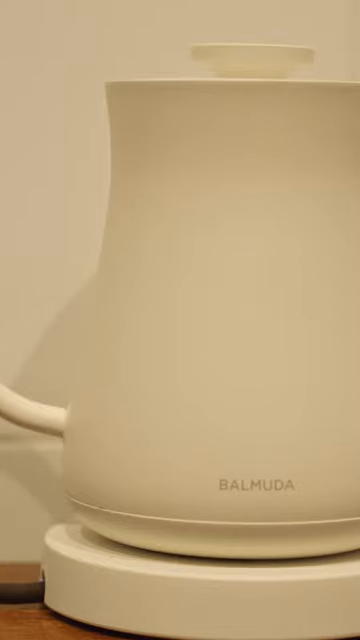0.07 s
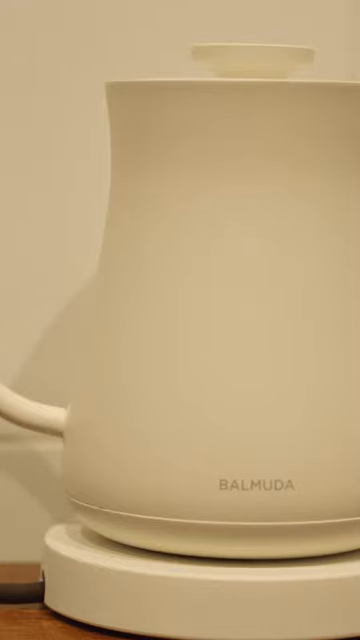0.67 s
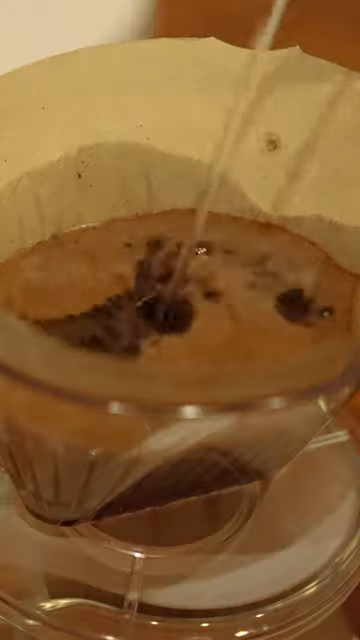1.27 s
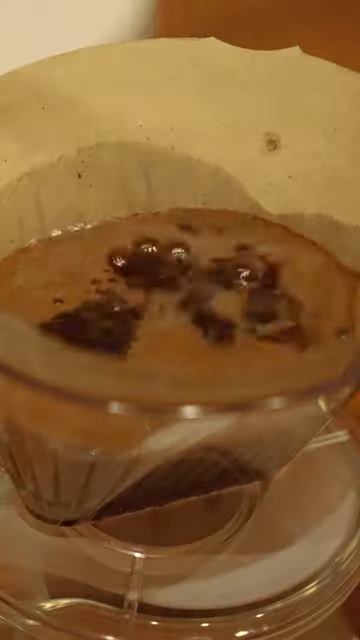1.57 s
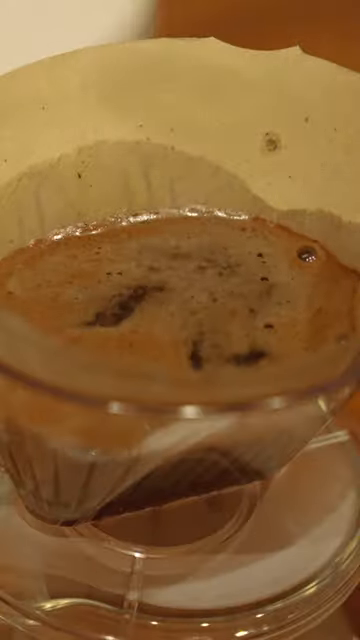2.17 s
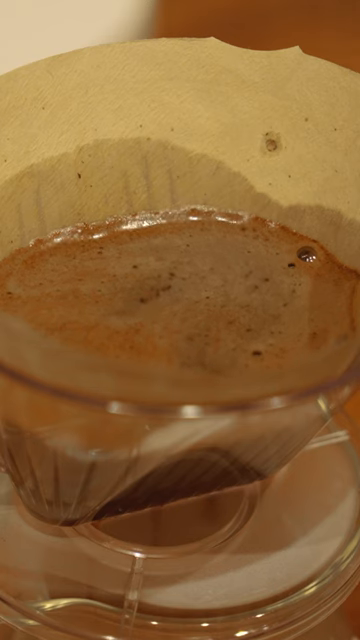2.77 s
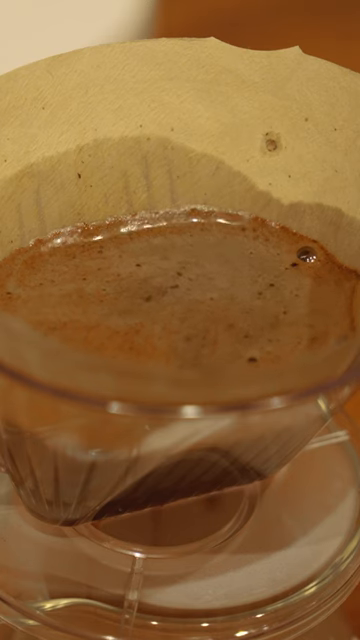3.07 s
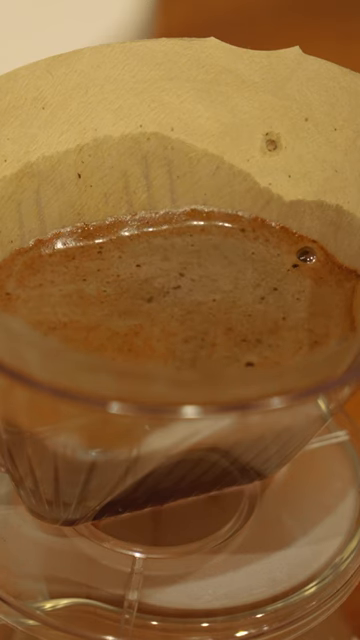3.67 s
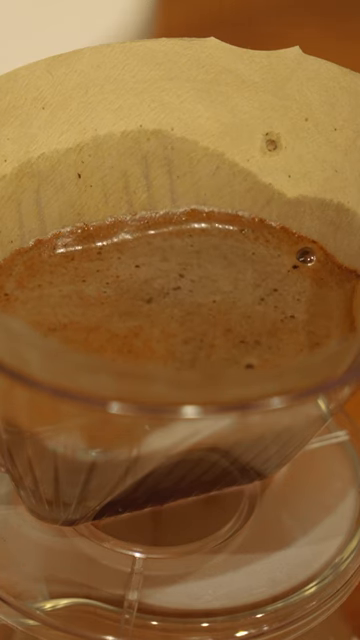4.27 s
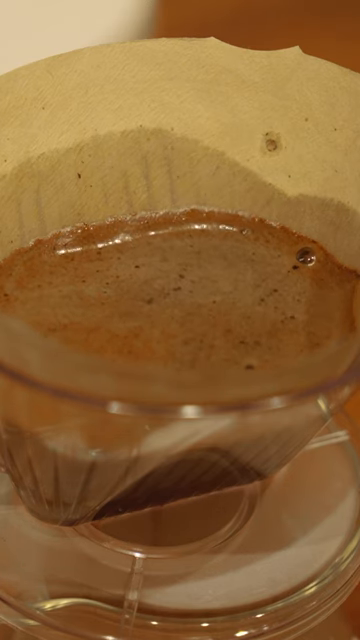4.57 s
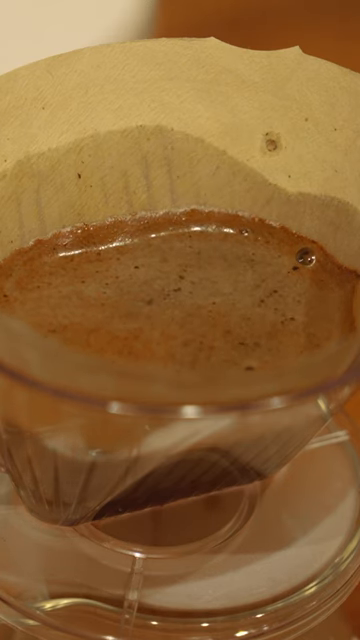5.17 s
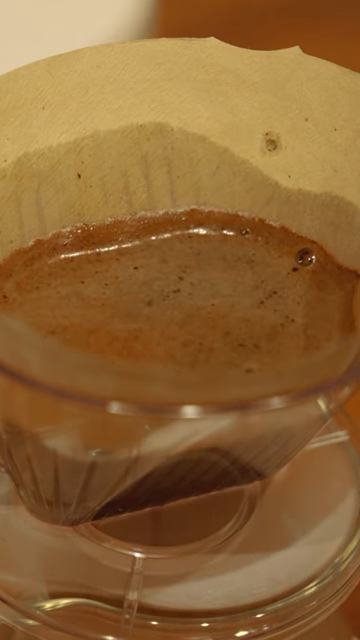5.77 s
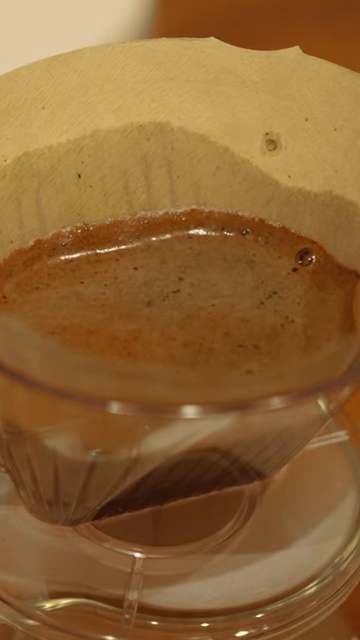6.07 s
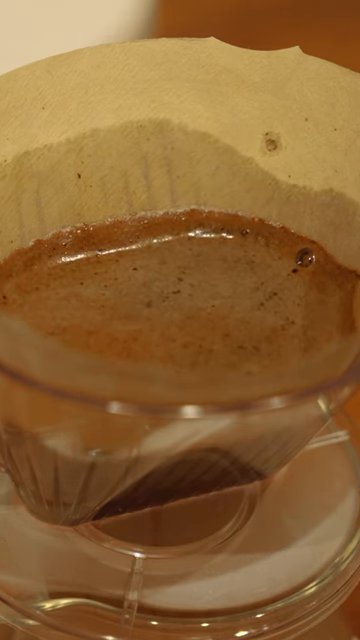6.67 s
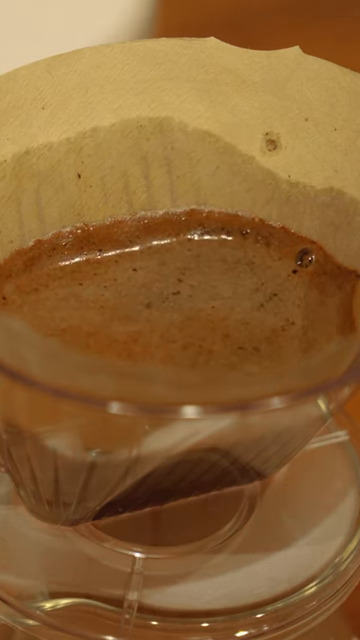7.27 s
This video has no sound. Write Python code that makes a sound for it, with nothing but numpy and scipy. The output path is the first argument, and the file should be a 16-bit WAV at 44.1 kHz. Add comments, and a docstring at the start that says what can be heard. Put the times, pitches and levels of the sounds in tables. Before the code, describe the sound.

A brief pour of water splashes into a coffee filter, then light drips tick and tinkle into a glass server over a low hum.

```python
"""A small room with a low ventilation hum; the microphone is close on a coffee dripper, nearly mono.
A thin stream from a kettle splashes into wet grounds in a paper filter, and the foam fizzes out.
Coffee then drips into the glass server below: drops tick on the pool, and trapped bubbles ping and
set the glass ringing. Far behind, something knocks dully once a second."""
import sys
import numpy as np
from scipy import signal
from scipy.fft import rfft, irfft, next_fast_len
from scipy.io import wavfile
from scipy.ndimage import map_coordinates

SR = 44100
rng = np.random.default_rng(int(sys.argv[2]) if len(sys.argv) > 2 else 0)


def bounce(signal):
    """Save signal as a 16-bit WAV file at the path given by the first command-line argument."""
    frames = np.transpose(np.atleast_2d(signal))
    limited = np.clip(frames, -1, 1)
    pcm = np.round(limited * 32767).astype(np.int16)
    wavfile.write(sys.argv[1], SR, pcm)


N = 323253
HIT_SAMPLES = 10240
TIME = np.arange(N) / SR
AGE = TIME[:HIT_SAMPLES]  # seconds since a hit
POUR_START_S, POUR_END_S = .756, 1.44


# A slight midrange dip in the tone of the plops and the churn: f/Hz, gain/dB
MID_DIP_EQ = [(260, 1), (400, -1), (650, -4), (1000, -2.5), (1800, -4.5), (2500, -2.5), (6000, -3),
              (15000, 0)]
# The bright tone of spray: f/Hz, gain/dB
SPRAY_EQ = [(500, -33), (2000, -24), (3300, 7), (5200, 8.5), (7500, 7), (10000, 12), (12500, 6), (16000, 1)]
# Plunges of the stream, close up: t/s, plop level/dB, cavity f/Hz, snap level/dB, snap f/Hz
PLUNGES = [(0.758, -39.5, 1440, -42.5, 3060), (.767, -40.5, 1720, -44, 4500),
           (0.795, -39.5, 1710, -42.5, 3050), (.81, -46, 1600, -48, 6000), (0.917, -34, 1210, -52, 3000),
           (0.949, -31.5, 1360, -46, 2500), (0.983, -56, 1500, -47, 9000), (1.042, -30, 1070, -34, 8400),
           (1.071, -29.5, 1030, -40, 3500), (1.1, -34.5, 1230, -44, 3000), (1.116, -43, 1710, -44, 4930),
           (1.126, -35.5, 1530, -46, 3000), (1.2362, -44, 1300, -49, 5200), (1.253, -29, 1150, -45, 6000),
           (1.269, -30.5, 1220, -42, 4000), (1.289, -15, 1150, -26, 6400), (1.321, -46, 1400, -37, 7080),
           (1.3298, -15.5, 910, -38, 5240), (1.335, -27.5, 496, -60, 3000), (1.406, -29.5, 1180, -48, 9000),
           (1.4141, -26.5, 1440, -31.5, 11100), (1.4209, -26, 1320, -35.5, 4600),
           (1.4381, -29.5, 1040, -38, 3480), (1.4497, -29, 1070, -35, 4470),
           (1.475, -43, 1600, -31.5, 6740), (1.508, -53, 1490, -34.5, 10200), (1.551, -47, 1700, -52, 6000),
           (1.578, -42.5, 1620, -58, 5000), (1.637, -58, 1690, -47, 8000), (1.661, -54, 1710, -41.5, 7100),
           (1.68, -60, 1700, -50, 7000), (1.753, -68, 1700, -46, 7950)]
def splashes():
    """Each plunge snaps, then its cavity plops, breaks up and sounds the cone and the dripper."""
    out = np.zeros(N)
    for s, plop_db, hz, snap_db, snap_hz in PLUNGES:
        body = dripper_body()
        cavity = bubble(hz, cycles=1.4, rise=.1) * (1 - fade(t60=.002))
        plop = colour(hit_level(cavity, 0) + gurgle(hz) + hit_level(body, -2), MID_DIP_EQ)
        crack = impact(near_t60=.009, near_db=1, far_t60=.08, far_db=-8)
        snap = colour(through(bubble(snap_hz, cycles=.5, rise=0), crack), SPRAY_EQ)
        add(out, s, hit_level(plop, plop_db) + hit_level(snap, snap_db))
    return out


# Resonances of the filter cone and the air around it: f/Hz, width/Hz, gain/dB
CONE_MODES = [(279, 20, -1), (534, 31, -10), (880, 130, -11.5), (1220, 280, -13), (1690, 75, -0.5),
              (2010, 120, -8), (2720, 250, -18)]
# Modes of the dripper and its stand: f/Hz, level/dB, t60/s
DRIPPER_MODES = [(250, -6, .2), (533, -5, .15), (848, 0, .09), (992, 2, .09), (1119, 1, .12),
                 (1312, -5, .06), (1560, -5, .05), (1750, 1, .08), (2085, -1, .04)]
def dripper_body():
    """The dripper rings and the cone echoes after a plunge; both need a moment to swell."""
    phases = rng.uniform(0, 2 * np.pi, len(DRIPPER_MODES))
    ring = sum(undb(db) * fade(t60) * np.sin(2 * np.pi * hz * AGE + phase)
               for (hz, db, t60), phase in zip(DRIPPER_MODES, phases))
    echo = resonate(reflections(t60=.011, db=8) + reflections(t60=.12, db=.5), CONE_MODES)
    return (hit_level(echo, -1) + hit_level(ring, 3)) * (1 - fade(t60=.013))


def gurgle(hz, count=9, span_s=.048, fall_db=10, spread_oct=.45):
    """A cavity breaks into smaller ones, later and weaker, each with its own pitch."""
    out = np.zeros(HIT_SAMPLES)
    for k, (jitter, pitch) in enumerate(zip(rng.random(count), scatter(count, limit=2))):
        late = (k + jitter) / count
        small = bubble(hz * 2 ** (spread_oct * pitch), cycles=3.5, rise=.15)
        small = hit_level(small, -12 - fall_db * late)
        out += np.pad(small, (int(late * span_s * SR), 0))[:HIT_SAMPLES]
    return out


# Small bubbles in the slurry: t/s, level/dB, f/Hz
SLURRY_BUBBLES = [(0.919, -40, 3180), (0.958, -45, 2500), (1.034, -41, 1900), (1.055, -40.5, 3280),
                  (1.127, -42, 2900), (1.199, -36, 1970), (1.237, -37.5, 5060), (1.356, -40, 2050),
                  (1.363, -53, 2550), (1.373, -49, 2100), (1.4322, -37, 4450), (1.51, -41, 3200),
                  (1.525, -48, 4100)]
def plips():
    """The stream drags small bubbles under; each rings for a few cycles at its own pitch."""
    out = np.zeros(N)
    for s, db, hz in SLURRY_BUBBLES:
        blow = impact(near_t60=.015, near_db=-3, far_t60=.08, far_db=-7)
        add(out, s, hit_level(through(bubble(hz, cycles=2.8, rise=.1), blow), db))
    return out


def stream(rise_db_per_s=19, release_db_per_s=220, foam_attack_s=.04, foam_decay_db_per_s=32):
    """Cavities churn in the deepening slurry; once the kettle tips back, the foam fizzes out."""
    before = np.maximum(POUR_END_S - TIME, 0)
    after = np.maximum(TIME - POUR_END_S, 0)
    churning = undb(-34.5 - rise_db_per_s * before - release_db_per_s * after)
    foaming = undb(-46.5) * np.minimum(after / foam_attack_s, 1)
    fizzing = (undb(-54.5) + foaming) * undb(-foam_decay_db_per_s * after)
    churn = colour(resonate(patter(rate=450, spread_db=5.5), CONE_MODES), MID_DIP_EQ)
    fizz = sprinkle(rate=280, spread_db=4, voice=spatter)
    return (TIME > POUR_START_S) * (level(churn, -4.5) * churning + level(fizz, -1.5) * fizzing)


def spatter():
    """One fleck of spray or bursting foam on the wet grounds, with its own pitch."""
    snap = bubble(5500 * 2 ** rng.uniform(-1, 1), cycles=.4, rise=0)
    return colour(through(snap, impact(near_t60=.01, near_db=3, far_t60=.1, far_db=-9)), SPRAY_EQ)


# Larger drops on the pool, close up: t/s, tick level/dB, tilt/(dB per octave), plop peak level/dB
DROPS = [(1.946, -43.5, -6, -37), (2.012, -43, -5, -35.5), (2.2256, -44, -8, -32), (2.3165, -53, -4, -33.5),
         (2.681, -46, -10, -55), (2.782, -48, -4, -40), (2.844, -38, -4.5, -35), (2.9378, -63, -10, -34.5),
         (3.0665, -43, -5, -35), (3.1287, -35.5, -9, -35), (3.231, -63, -14, -30.5), (3.3533, -57, 2, -32),
         (3.8127, -46, 3, -37), (3.831, -45, 1, -31.5), (3.8764, -42, -12, -49), (3.893, -37.5, 2, -32),
         (3.947, -29, -8, -38), (4.158, -44.5, -7, -52), (4.196, -49, 0, -50), (4.286, -46.5, -7, -30.5),
         (4.35, -46, -5, -34), (4.4247, -45, -5, -33.5), (4.524, -36, -1, -27), (4.553, -33.5, 3, -38),
         (4.745, -59, -8, -31), (4.792, -45.5, -6, -42), (4.8773, -38, 9, -42), (4.95, -46, -4, -52),
         (5.11, -40, 17, -51), (5.159, -42, -1, -48), (5.374, -51, 12, -48), (5.389, -42, -4, -28),
         (5.477, -52, -10, -26), (5.499, -47, -10, -33.5), (5.533, -50, -4, -38), (5.5562, -37.5, 14, -35),
         (5.5902, -41.5, -3, -42), (5.681, -60, -10, -34), (5.716, -40.5, -4, -41), (5.726, -46, -9, -48),
         (5.811, -41.5, -12, -33), (5.8816, -34.5, -8.5, -34), (6.0318, -60, -12, -34),
         (6.098, -39.5, -9, -39), (6.155, -44, -7, -48), (6.181, -45, 0, -39), (6.4623, -46, 7, -47),
         (6.491, -49, -1, -56), (6.6927, -43, 12, -60), (6.7906, -40.5, 13, -50), (6.839, -43, -9, -37),
         (7.044, -44.5, -3, -47), (7.059, -39, -9, -48), (7.085, -47, -6, -35.5), (7.111, -41, -8, -46),
         (7.1302, -28, 4, -31), (7.288, -38.5, -4, -40)]
def drips():
    """Drops tick on the pool and echo in the server; small, hard ones are brighter, fat ones plop."""
    out = np.zeros(N)
    for s, db, tilt, plop_db in DROPS:
        blow = impact(near_t60=.015, near_db=6, far_t60=.085, far_db=.5)
        tick = resonate(blow, server_modes(fill_ratio(s))) + undb(-7.5) * blow
        tick = shape(tick, lambda f: undb(tilt * np.log2(np.clip(f, 3600, 12000) / 6000)))
        add(out, s, hit_level(tick, db) + undb(plop_db) * pool_plop())
    return out


# A hard drop mostly clicks, a gentle one lets its bubble ring: level/dB, decay/cycles
PING_CYCLES = [(-51, 8.6), (-39.5, 1.43), (-19, 0.61)]
# Drops that trap a bubble: t/s, level/dB, f/Hz, glass ring level/dB, ring centre f/Hz
TRAPPED_BUBBLES = [(1.198, -32, 14000, -50, 11500), (2.169, -46, 14500, -55, 12000),
                   (2.358, -38, 11500, -43, 11500), (2.4356, -34.5, 8150, -41.5, 7900),
                   (2.862, -45, 11400, -60, 11500), (2.954, -39.5, 8240, -58, 8000),
                   (3.004, -50, 14000, -55, 12000), (3.031, -47, 5940, -43, 6200),
                   (3.214, -58, 7200, -59, 7600), (3.527, -38, 8500, -51, 7900),
                   (4.216, -36, 10400, -41, 11000), (4.31, -39, 11800, -47, 11500),
                   (4.34, -51, 7800, -54, 8000), (4.581, -35, 10600, -58, 11000),
                   (4.638, -22.5, 6660, -34, 6600), (4.658, -25, 7160, -28.5, 6800),
                   (4.809, -43, 5300, -62, 5500), (4.9003, -33.5, 8000, -40, 8000),
                   (4.9884, -31.5, 6400, -34, 5400), (5.296, -39.5, 3600, -42.5, 4300),
                   (5.4362, -42, 8800, -60, 8000), (5.452, -33, 2540, -55, 3500),
                   (6.099, -38, 11000, -56, 11000), (6.5529, -32, 7050, -40.5, 6940),
                   (6.904, -38, 4200, -33.5, 4140), (6.987, -38.5, 7800, -50, 8000)]
def pings():
    """A drop snaps wetly over a hollow plop; its trapped bubble pings and the glass wall rings."""
    out = np.zeros(N)
    for s, db, hz, ring_db, ring_hz in TRAPPED_BUBBLES:
        cycles = curve(PING_CYCLES, db)
        cavity = np.gradient(bubble(hz, cycles, rise=.023)) / (np.pi * cycles)
        blow = impact(near_t60=.015, near_db=5, far_t60=.12, far_db=2)
        body = resonate(blow, server_modes(fill_ratio(s))) + undb(1) * blow
        snap = undb(-21) * (AGE == 0)
        ping = hit_level(through(cavity + snap, body), db)
        add(out, s, ping + glass_ring(ring_hz, ring_db) + undb(db - 6.5) * pool_plop())
    return out


# A harder blow wakes a wider range of wall modes: ring level/dB, reach/octaves
WALL_REACH = [(-42, .2), (-35, .33)]
# Long modes of the glass wall: f/Hz, level/dB, t60/s
WALL_MODES = [(3135, -19, .2), (4205, -1, .21), (4323, -4, .15), (4689, -8, .15), (4915, -9, .11),
              (5735, 0, .15), (5857, -4, .2), (6530, -9, .12), (7090, -11, .13), (7262, -6, .12),
              (7445, -1.5, .16), (7854, -11, .09), (10130, -8, .13), (10820, -4, .09), (11690, -3, .09)]
def glass_ring(centre_hz, ring_db, beat_spread_hz=55):
    """The wall rings near a pitch set by where the drop lands; each mode has a faint, beating twin."""
    reach = curve(WALL_REACH, ring_db)
    share = lambda hz: np.exp(-.5 * (np.log2(hz / centre_hz) / reach) ** 2)
    ring = 0
    for (hz, db, t60), (weight, split) in zip(WALL_MODES, rng.standard_normal((len(WALL_MODES), 2))):
        mode = np.sin(2 * np.pi * hz * AGE + np.pi * split)
        twin = .4 * np.sin(2 * np.pi * (hz + beat_spread_hz * split) * AGE)
        ring += share(hz) * undb(db + weight) * fade(t60) * (mode + twin)
    wash = shape(reflections(t60=.06, db=0), share)  # dense, short modes between the long ones
    return hit_level(hit_level(ring, 0) + hit_level(wash, -7), ring_db)


# Resonances of the half-full server: f/Hz, width/Hz, gain/dB
SERVER_MODES = [(1870, 110, 6.5), (3130, 600, 1), (4280, 140, -5), (5350, 260, 1.5), (6900, 670, -5),
                (8355, 360, 14.5), (10400, 300, 1), (11110, 190, 10), (12140, 130, 8), (14000, 800, 4)]
def server_modes(ratio, spread_db=2.5):
    """The server's resonances, retuned by ratio and weighted by where the drop happens to land."""
    weights = scatter(len(SERVER_MODES), limit=1.5)
    return [(hz * ratio, width, db + spread_db * w) for (hz, width, db), w in zip(SERVER_MODES, weights)]


def fill_ratio(s, sag_per_s=.009, half_full_s=4.8):
    """Frequency ratio of the server's resonances, which sink as the coffee rises."""
    return 1 - sag_per_s * (s - half_full_s)


# Resonances of the air in the server: f/Hz, width/Hz, gain/dB
AIR_MODES = [(1590, 5.4, 14), (1786, 130, 8.5), (2065, 150, 2), (2900, 630, 7)]
def pool_plop():
    """A drop opens a small cavity, each of its own size, that sounds the air in the server; peak 1."""
    cavity = bubble(1850 * np.exp(.1 * rng.standard_normal()), cycles=1.1, rise=.15)
    blow = impact(near_t60=.015, near_db=-6, far_t60=.2, far_db=-2)
    sound = through(cavity, resonate(blow, AIR_MODES) + undb(-28.5) * blow)
    return sound / np.abs(sound).max()


def trickle(flow_spread_s=.12, thread_swell_db=1, droplet_swell_db=5.5):
    """A thread of coffee bubbles into the pool among tiny droplets; both swell where drops crowd."""
    flow = np.tanh(sum(np.exp(-((TIME - s) / flow_spread_s) ** 2) for s, *_ in DROPS))
    thread = sprinkle(rate=130, spread_db=2.5, voice=pool_plop)
    thread = level(thread, -54) * undb(thread_swell_db * flow)
    taps = sprinkle(rate=8 + 26 * flow, spread_db=3, voice=droplet)
    sinking_taps = map_coordinates(taps, [np.cumsum(fill_ratio(TIME))], mode="mirror")
    droplets = level(sinking_taps, -65) * undb(droplet_swell_db * flow)
    return (TIME > POUR_START_S) * (thread + droplets)


def droplet():
    """A tiny drop ticks on the pool and briefly sounds the server."""
    tap = impact(near_t60=.012, near_db=3, far_t60=.1, far_db=-1)
    return resonate(tap, server_modes(1 + .012 * rng.standard_normal())) + tap


def foam_pops(count=85, centre_hz=6000, spread_oct=.64, spread_db=3):
    """After the pour, tiny foam bubbles keep bursting on the grounds, each a dry pop of its own pitch."""
    out = np.zeros(N)
    for when, (pitch, size) in zip(rng.random(count), scatter((count, 2), limit=1.6)):
        cavity = bubble(centre_hz * 2 ** (spread_oct * pitch), cycles=.7, rise=.1)
        pop = through(np.gradient(cavity), impact(near_t60=.008, near_db=-3, far_t60=.08, far_db=-9))
        add(out, POUR_END_S + when * (N / SR - POUR_END_S), hit_level(pop, -56 + spread_db * size))
    return out


def kettle_hiss(swell_s=.56):
    """The hot kettle hisses very faintly before the pour."""
    hiss = colour(rng.standard_normal(N), [(500, -32), (1500, .5), (3800, -4), (4600, -7), (12000, -14)])
    return level(hiss, -65) * (TIME < POUR_START_S) * np.clip(TIME / swell_s, .35, 1)


def knocks(first_s=1.946, period_s=1.0, strong_db=-50, weak_db=-58):
    """Dull knocks, strong and weak in turn, like a far clock; the microphone gets mostly reverberation."""
    out = np.zeros(N)
    dull_eq = [(400, -35), (750, 0), (950, 12), (1300, 1), (1700, -2), (4000, -31)]
    for i, s in enumerate(np.arange(first_s, N / SR, period_s)):
        thud = reflections(t60=.35, db=-7) * (1 - fade(t60=.067))
        add(out, s, level(colour(thud, dull_eq), weak_db if i % 2 else strong_db))
    return out


# The rush of the ventilation at the microphone: f/Hz, relative level/dB
RUSH_SPECTRUM = [(25, -23), (48, -9), (62, -1), (80, -4.5), (120, 2.5), (200, -1), (300, -12.5),
                 (400, -11.5), (680, -17.5), (1020, -13.5), (1350, -22.5), (2500, -26), (6000, -31),
                 (15500, -35.5)]
# Room modes that carry the hum: f/Hz, width/Hz, relative level/dB
ROOM_MODES = [(97, 3.5, -19), (135.3, 19.5, 0.5), (155.3, 5.6, -1), (244.2, 21, -8), (255, 36, -10),
              (333.5, 15.8, -11), (437.1, 5.1, -11.5), (530.7, 35.2, -16), (600, 9, -18.5), (967, 3.3, -33)]
def ventilation():
    """A soft rush and a hum that wavers in the room's modes; both are much quieter at first and step up
    abruptly at 0.756 s."""
    rush = colour(rng.standard_normal(N), RUSH_SPECTRUM)
    power = lambda f: sum(undb(db) ** 2 / (1 + 2 * ((f - hz) / width) ** 2) ** 2
                          for hz, width, db in ROOM_MODES)
    hum = shape(rng.standard_normal(N), lambda f: np.sqrt(power(f)))
    early = TIME <= POUR_START_S
    return level(rush, -41) * undb(-14.5 * early) + level(hum, -34) * undb(-22 * early)


# Room tone that differs between the capsules, before the pour: f/Hz, relative level/dB
RUMBLE_SPECTRUM = [(15, -44), (25, -9), (69, -2), (146, -10), (264, -20), (515, -27), (1120, -31),
                   (15000, -40)]
# The same from the start of the pour onwards: f/Hz, relative level/dB
DIFFUSE_SPECTRUM = [(25, -15), (62, -11), (95, -4), (190, 0.5), (300, 2.5), (500, -2.5), (1000, -10.5),
                    (2200, -30), (4200, -37), (8300, -25.5), (15500, -20.5)]
def room_tone():
    """Diffuse noise reaches the two capsules unequally: mostly rumble at first, then a broader wash."""
    rumble = level(colour(rng.standard_normal(N), RUMBLE_SPECTRUM), -61.5)
    wash = level(colour(rng.standard_normal(N), DIFFUSE_SPECTRUM), -62)
    return np.where(TIME > POUR_START_S, wash, rumble)


def bubble(hz, cycles, rise):
    """A damped air cavity whose pitch climbs by the fraction rise as it nears the surface."""
    life = AGE * hz / cycles
    pitch_hz = hz * (1 + rise * np.tanh(life / 2))
    return np.exp(-life) * np.sin(2 * np.pi * np.cumsum(pitch_hz) / SR)


def impact(near_t60, near_db, far_t60, far_db):
    """An impulse with its echoes from the vessel (near) and from the room (far)."""
    return (AGE == 0) + reflections(near_t60, near_db) + reflections(far_t60, far_db)


def reflections(t60, db):
    """A dense, dying cloud of echoes whose energy is db against the direct sound."""
    cloud = rng.standard_normal(HIT_SAMPLES) * fade(t60)
    return cloud * undb(db) / np.linalg.norm(cloud)


def patter(rate, spread_db):
    """Random impulses, about rate a second, many small and a few large."""
    chance = rng.random(N)
    polarity, size = rng.standard_normal((2, N))
    return (chance < rate / SR) * np.sign(polarity) * undb(spread_db * np.clip(size, -2, 2))


def sprinkle(rate, spread_db, voice, count=24):
    """Random impacts, each picked from count slightly different sounds of voice()."""
    sounds = [hit_level(voice(), 0) for _ in range(count)]
    sizes = patter(rate, spread_db)
    picks = rng.integers(count, size=N)
    out = np.zeros(N)
    for i in np.flatnonzero(sizes):
        add(out, i / SR, sizes[i] * sounds[picks[i]])
    return out


def scatter(size, limit):
    """Normal draws, clipped either side at limit."""
    return np.clip(rng.standard_normal(size), -limit, limit)


def fade(t60):
    """Exponential decay, 60 dB in t60 seconds."""
    return np.exp(-np.log(1000) * AGE / t60)


def shape(x, response):
    """Filter by a response that is a function of frequency."""
    size = next_fast_len(len(x) + HIT_SAMPLES)
    hz = np.maximum(np.fft.rfftfreq(size, 1 / SR), 1)
    return irfft(rfft(x, size) * response(hz), size)[:len(x)]


def colour(x, points):
    """Filter by a spectrum of (f/Hz, gain/dB) points."""
    hz, db = np.transpose(points)
    return shape(x, lambda f: undb(np.interp(np.log(f), np.log(hz), db)))


def resonate(x, modes):
    """Pass through parallel resonances (f/Hz, width/Hz, gain/dB)."""
    return shape(x, lambda f: sum(undb(db) / (1 + 1j * (f ** 2 - hz ** 2) / (f * width))
                                  for hz, width, db in modes))


def through(x, response):
    """Convolve, keeping the length."""
    return signal.fftconvolve(x, response)[:len(x)]


def curve(rows, at):
    """Read a two-column table along straight lines."""
    return np.interp(at, *np.transpose(rows))


def undb(db):
    """Decibels to gain."""
    return 10 ** (np.asarray(db) / 20)


def level(x, db):
    """Set the rms level."""
    return x * undb(db) / np.sqrt(np.mean(x ** 2))


def hit_level(x, db):
    """Set the rms level of a hit's first 10 ms."""
    return x * undb(db) / np.sqrt(np.mean(x[:SR // 100] ** 2))


def add(out, s, x):
    """Mix x in at time s."""
    i = int(s * SR)
    out[i:i + len(x)] += x[:max(N - i, 0)]


def scene():
    """The coffee is close and on axis; only the room differs a little between left and right."""
    plunges = splashes()
    coffee = plunges + plips() + stream() + foam_pops() + drips() + pings() + trickle()
    mid = coffee + kettle_hiss() + knocks() + ventilation()
    diffuse = room_tone()
    walls = colour(through(plunges, reflections(t60=.12, db=-28.5)), [(600, 8), (1200, -14), (2500, -23)])
    side = diffuse + walls + through(coffee, reflections(t60=.059, db=-47))
    return np.array([mid + side, mid - side])


def record(dry, top_hz=15900):
    """The recorder cuts the top with a steep low-pass."""
    return signal.sosfilt(signal.ellip(10, .2, 80, top_hz, fs=SR, output="sos"), dry)


dry = scene()
out = record(dry)
bounce(out)
```